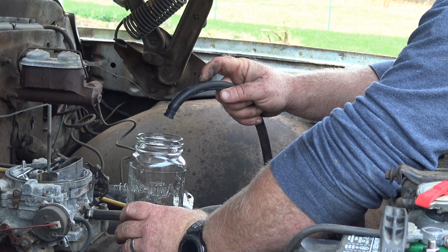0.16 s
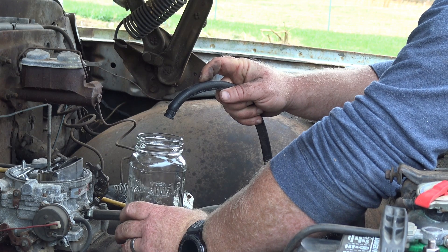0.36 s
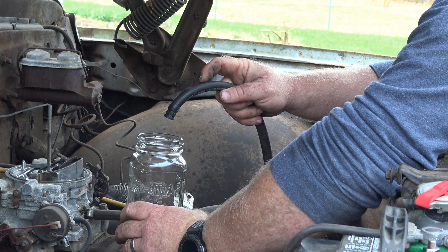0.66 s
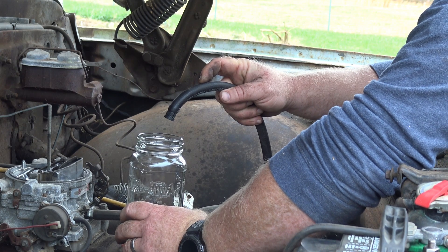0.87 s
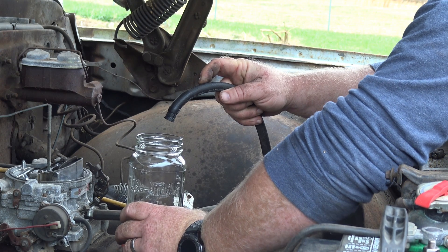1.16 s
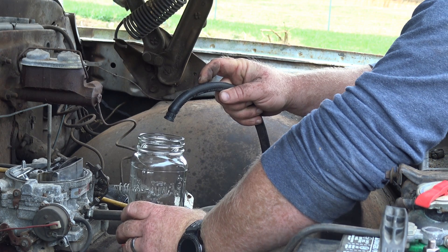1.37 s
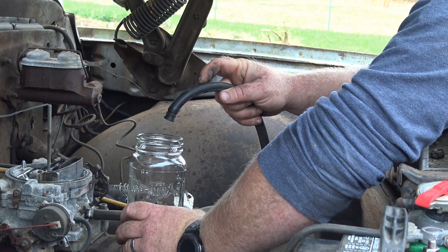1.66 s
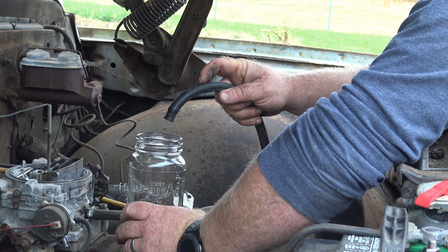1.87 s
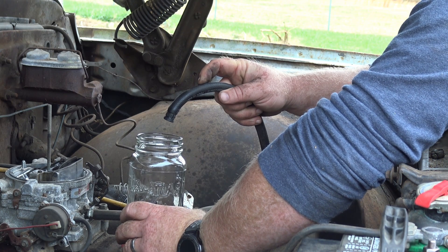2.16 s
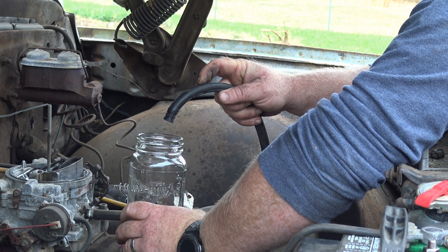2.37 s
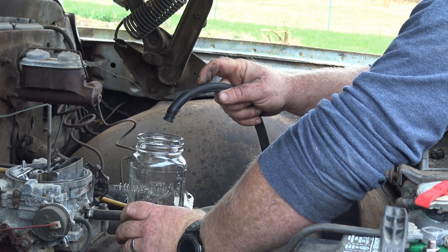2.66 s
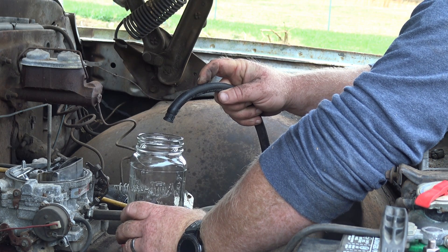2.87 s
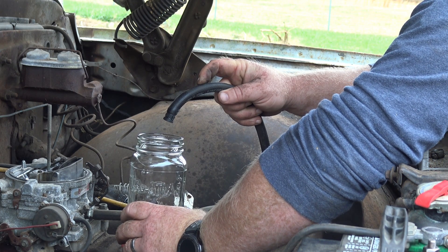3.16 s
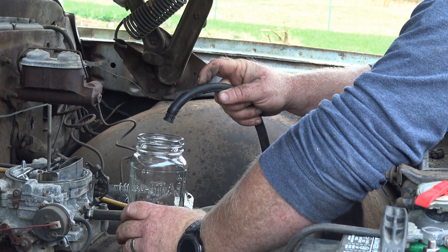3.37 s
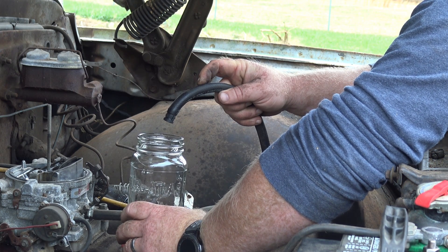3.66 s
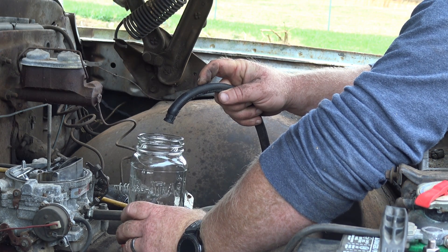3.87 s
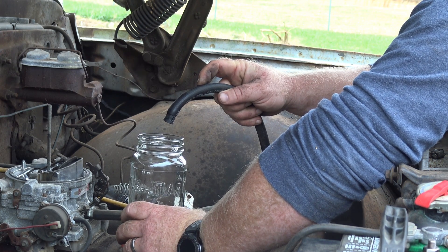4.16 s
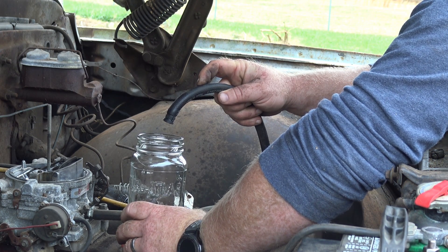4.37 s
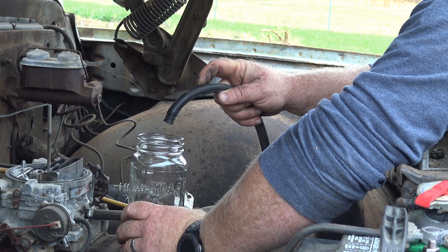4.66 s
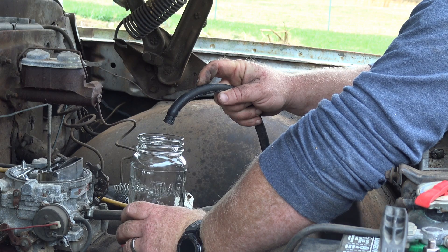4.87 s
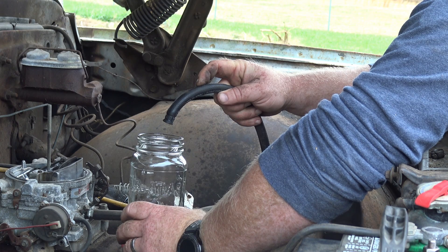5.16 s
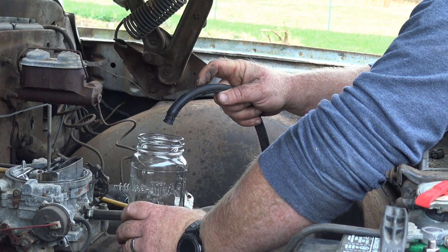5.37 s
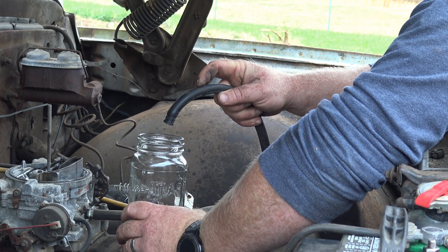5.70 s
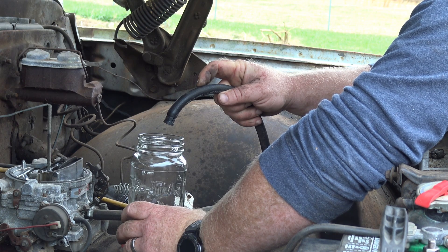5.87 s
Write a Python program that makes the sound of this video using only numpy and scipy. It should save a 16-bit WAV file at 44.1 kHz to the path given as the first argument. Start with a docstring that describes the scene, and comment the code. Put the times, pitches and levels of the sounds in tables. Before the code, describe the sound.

An old truck's starter clacks in and cranks the engine with a fast, whining, rhythmic churn, but it never fires.

```python
"""Soft rustles over quiet outdoor air, then a clack and a clunk: an old truck's starter cranks; it never fires.
The pinion clacks into the ring gear (filtered noise bursts) and drags the engine up to speed.
The gear whine is made tooth by tooth. Each compression slows the crank and presses the teeth together,
so at speed the whine sags and swells eleven times a second, ringing the housing and the engine bay.
Rasping squeals, dull knocks and the noise of the churning, rocking engine join it, under the open bonnet."""
import sys
import numpy as np
from scipy import signal
from scipy.fft import rfft, irfft, next_fast_len
from scipy.io import wavfile

SR = 44100
rng = np.random.default_rng(int(sys.argv[2]) if len(sys.argv) > 2 else 0)


def dump(signal):
    """Clip the signal to [-1, 1] and save it as 16-bit WAV at the path in sys.argv[1]."""
    limited = np.clip(np.atleast_2d(signal).T, -1, 1)
    pcm = np.round(limited * 32767).astype(np.int16)
    wavfile.write(sys.argv[1], SR, pcm)


N = 266187
TIME = np.arange(N) / SR   # seconds
FFT_SIZE = next_fast_len(N + SR)
HZ = np.maximum(np.arange(FFT_SIZE // 2 + 1) * SR / FFT_SIZE, 1)
PINION_TEETH = 9

# The slow compressions of the first turn. Each row: start in seconds, tooth rate at the start in Hz,
# fastest tooth rate in Hz, share of the stroke at which it is fastest (0-1), gear level there in dB.
FIRST_COMPRESSIONS = [(.48, 195.4, 279, .72, -14.5), (.8, 204.8, 323.5, .48, -15),
                      (.985, 317.2, 385, .25, -15), (1.103, 349.5, 415.8, .3, -15)]
# Crank speed once the first turn is over. Each row: time in seconds, speed in turns a minute.
CRANK_SPEED = [(1.2205, 162.1), (2, 168.93), (3.2, 167.96), (4.6, 171.55), (6.04, 170.06)]
# The drive takes up its slack with a knock. Each row: start in seconds, level in dB.
SLACK_KNOCKS = [(1.24, -20.5), (1.695, -27), (1.969, -20.5), (2.768, -28), (3.03, -22.5), (3.393, -23),
                (4.104, -26), (5.505, -30.5)]


def from_db(db):
    """Turn decibels into a gain."""
    return 10 ** (np.asarray(db) / 20)


def rms_one(x):
    """Scale to an rms (average strength) of 1."""
    return x / np.sqrt(np.mean(x ** 2) + 1e-20)


def follow(rows, at=TIME):
    """Join the points of a table by straight lines, one curve for each column after the first."""
    first, *columns = np.transpose(rows)
    return [np.interp(at, first, c) for c in columns]


def response(points):
    """Gain at every frequency from a few points, falling 24 dB an octave past the last one."""
    hz, db = np.transpose(points)
    gain = from_db(np.interp(np.log(HZ), np.log(hz), db))
    return gain / np.maximum(HZ / hz[-1], 1) ** 4


def resonances(modes):
    """Power response of a set of resonances: each is a peak at its own pitch."""
    power = 0
    for hz, width, db in modes:
        off_pitch = (HZ / hz - hz / HZ) * hz / width
        power = power + from_db(db) ** 2 / (1 + off_pitch ** 2)
    return power


def through(x, gain):
    """Filter that responds at once, never ahead (minimum phase), and keeps the power of white noise."""
    cepstrum = irfft(np.log(rms_one(gain) + 1e-6), FFT_SIZE)
    # folding the second half onto the first gives the minimum phase
    cepstrum[1:FFT_SIZE // 2] *= 2
    cepstrum[FFT_SIZE // 2 + 1:] = 0
    spectrum = rfft(x, FFT_SIZE) * np.exp(rfft(cepstrum))
    return irfft(spectrum, FFT_SIZE)[:N]


def noise():
    """White noise: every frequency equally strong."""
    return rng.standard_normal(N)


def drift(per_s):
    """Random wandering of rms 1, with per_s new values a second joined by straight lines."""
    return rms_one(np.interp(TIME * per_s, np.arange(N), noise()))


def burst(s, db, t60):
    """Envelope of a blow that starts at once and dies away by 60 dB in t60 seconds."""
    return (TIME >= s) * from_db(db - 60 * np.maximum(TIME - s, 0) / t60)


def rustles(rise_s=.006):
    """Soft brushing before the key is turned: noise that rises fast and dies away."""
    # Each row: start in seconds, level in dB, time to fall 60 dB in seconds.
    brushes = [(0, -56, .6), (.06, -46.5, .2), (.32, -66, 0.74)]
    # Tone colour of the brushing. Each row: frequency in Hz, relative level in dB.
    colour = [(80, -18), (170, 15), (400, -1), (900, -2), (1400, -5), (2400, -4), (3200, -10), (4500, -22),
              (6000, -25), (12000, -34)]
    level = sum(burst(s, db, t60) * np.clip((TIME - s) / rise_s, 0, 1) for s, db, t60 in brushes)
    return level * through(noise(), response(colour))


def outdoor_air(level_db=-57.5):
    """Faint steady noise, strongest in the bass: the quiet yard."""
    # Tone colour of outdoor air. Each row: frequency in Hz, relative level in dB.
    colour = [(25, -15), (50, -13), (75, -4.5), (150, -10.5), (300, -16.5), (450, -15.5), (900, -22.5),
              (1500, -29), (3000, -36), (6000, -39), (15000, -42)]
    return from_db(level_db) * through(noise(), response(colour))


def engagement(clunk_s=.495, clunk_db=-18, clunk_t60=0.24, rise_s=0.0027):
    """The solenoid pulls in, the pinion slams home and the block answers with a clunk."""
    # Blows of solenoid and pinion. Each row: start in seconds, level in dB, time to fall 60 dB in seconds.
    clacks = [(0.449, -39, 0.17), (0.46, -26.5, 0.3), (.483, -15.5, 0.071), (0.489, -11.5, 0.061)]
    # Tone colours of the clacks and of the clunk. Each row: frequency in Hz, relative level in dB.
    clack_colour = [(100, -24), (250, -8), (480, -1), (750, -4), (1100, -6), (1800, -3), (2600, -5),
                    (4000, -11.5), (6300, -12.5), (8000, -23.5), (11000, -23), (14500, -34), (15500, -40)]
    clunk_colour = [(100, -14), (150, -20), (300, 3), (520, 3), (720, -10), (880, 7), (1270, -14),
                    (1700, -4), (2400, -6)]
    blows = sum(burst(s, db, t60) * np.clip((TIME - s) / rise_s, 0, 1) for s, db, t60 in clacks)
    clack = through(noise() * blows, response(clack_colour))
    clunk = through(noise() * burst(clunk_s, clunk_db, clunk_t60), response(clunk_colour))
    return clack + clunk


def turning(rise_s=0.033):
    """Gain that fades in as the starter begins to turn."""
    return np.clip((TIME - FIRST_COMPRESSIONS[0][0]) / rise_s, 0, 1)


def spin_up(end_hz=385, dip_db=-9, first_db=-9.5, roundness=1.9):
    """Tooth rate and gear level in the first turn: both swell after each compression and sink into the next."""
    starts, slow_hz, fast_hz, fastest_at, peak_db = np.transpose(FIRST_COMPRESSIONS)
    edges = np.r_[starts, CRANK_SPEED[0][0]]
    peaks = starts + fastest_at * np.diff(edges)
    times = np.sort(np.r_[edges, peaks])
    rates_hz = np.r_[np.c_[slow_hz, fast_hz].ravel(), end_hz]   # slow and fast by turns
    tooth_hz = np.interp(TIME, times, rates_hz)
    from_peak = np.interp(TIME, times, np.arange(len(times)) % 2 == 0)   # 0 at a peak, 1 at an edge
    level_db = np.interp(TIME, peaks, peak_db) + dip_db * from_peak ** roundness
    # softer still at first contact
    return tooth_hz, level_db + np.interp(TIME, [starts[0], peaks[0]], [first_db, 0])


def load(share, peak_at):
    """Load on the teeth through one stroke, 0-1: it bites at once, swells to its peak and lets go."""
    bite_from, bite_to, release_end = 0.047, 0.093, 0.92   # shares of a stroke
    bite_share, release_curve = 0.79, 2.15
    bite = np.interp(share, [bite_from, bite_to], [0, bite_share])
    swell = (1 - bite_share) * np.minimum(share / peak_at, 1)
    release = np.clip((share - peak_at) / (release_end - peak_at), 0, 1) ** release_curve
    return bite + swell - release


def surging(share, uneven=.13):
    """The crank springs forward as each compression passes, then is slowed by the next; in Hz of tooth rate."""
    size_hz, early, rise, hold, end = 50.91, .03, .08, .19, .72   # times are shares of a stroke
    surge = np.interp(share, [-early, rise, hold, end], [0, 1, 1, 0], period=1) - .5
    return size_hz * surge * (1 + uneven * drift(11))   # no two compressions are quite alike


def crank(waver=.009):
    """Tooth rate, gear level and rattle: the spin-up, then four compressions to every turn."""
    # The four compressions of a turn. Each row: lead as a share of a stroke, peak load in dB,
    # share of the stroke at which it peaks, tooth rate offset in Hz.
    compressions = [(0, 4, 0.28, -1), (.02, 4, 0.45, 10), (.05, 0.94, 0.44, 8), (.072, 1.1, .5, -6)]
    # Gear level at cranking speed, before the load. Each row: time in seconds, level in dB.
    gear_level = [(1.2, -16.5), (4.3, -19.5), (6.04, -19)]
    ring_teeth = 168
    rattle_first_db, rattle_true_db, rattle_settle = 3.5, -3.5, 0.78   # settles over a share of each stroke
    slack_s, slack_lead_s, slack_db = .02, 0.0085, -8   # the gear goes slack just ahead of each knock

    lead, peak_db, peak_at, offset_hz = np.transpose(compressions)
    per_turn = len(compressions)
    running = TIME > CRANK_SPEED[0][0]
    rpm, = follow(CRANK_SPEED)
    even_strokes = per_turn * np.cumsum(running * rpm / 60) / SR
    strokes = even_strokes + np.interp(even_strokes, np.arange(per_turn) - lead, lead, period=per_turn)
    cylinder = strokes.astype(int) % per_turn
    share = strokes % 1

    middles = np.arange(per_turn) + .5
    cylinder_hz = np.interp(strokes, middles, offset_hz, period=per_turn)
    steady_hz = ring_teeth * rpm / 60 + surging(share) + cylinder_hz

    unloaded_db = -11
    load_db = unloaded_db + (peak_db[cylinder] - unloaded_db) * load(share, peak_at[cylinder])
    steady_db = follow(gear_level)[0] + load_db

    early_hz, early_db = spin_up()
    slack = 0
    for s, _ in SLACK_KNOCKS:
        slack = slack + ((TIME > s - slack_lead_s - slack_s) & (TIME < s - slack_lead_s))
    tooth_hz = np.where(running, steady_hz, early_hz) * (1 + waver * drift(40))
    level_db = np.where(running, steady_db, early_db) + slack_db * slack
    rattle_db = np.interp(share * running, [0, rattle_settle], [rattle_first_db, rattle_true_db])
    return tooth_hz, level_db, rattle_db


def pinion_runout(teeth):
    """The pinion runs slightly out of true: a sine wave, -1 to 1, once a turn of the pinion."""
    return np.sin(2 * np.pi * teeth / PINION_TEETH)


def gear(teeth, level_db, rattle_db, jitter_s=.000022, scatter_db=2.0, slide=2.5, runout_db=1.06):
    """Each tooth lands with a click, a little early or late, then scrapes along its mate."""
    landed = np.flatnonzero(np.diff(np.floor(teeth)))
    chance = rng.standard_normal((len(landed), 2))
    when = np.interp(np.floor(teeth[landed + 1]), teeth, TIME) + jitter_s * chance[:, 0]
    clicks = np.zeros(N)
    clicks[np.clip(np.round(when * SR).astype(int), 0, N - 1)] = from_db(scatter_db * chance[:, 1])
    scrape = rms_one(noise() * np.exp(-slide * (teeth % 1)))
    rattle = from_db(rattle_db)   # scrape against click
    mesh = (rms_one(clicks) + rattle * scrape) / np.sqrt(1 + rattle ** 2)
    bite_db = level_db + runout_db * pinion_runout(teeth)   # bites deeper once a turn
    return from_db(bite_db) * mesh


def soften(force, tooth_hz, soft_hz=9000, slow_hz=225, fast_hz=340):
    """Slow teeth meet gently, so their clicks lack the top treble."""
    soft = signal.sosfilt(signal.butter(2, soft_hz, fs=SR, output="sos"), force)
    hard = np.clip((tooth_hz - slow_hz) / (fast_hz - slow_hz), 0, 1)
    return hard * np.roll(force, 1) + (1 - hard) * soft   # the hard clicks sit one sample later


def housing(force, ring_db=12):
    """The castings and the tin cover ring under the teeth: a broad response plus many narrow peaks."""
    # Broad response of the castings. Each row: frequency in Hz, relative level in dB.
    broad = [(200, -21), (450, -20), (800, -7), (1200, -16), (1700, 2.5), (2100, -14), (2600, 5.5),
             (4000, -1), (5000, 0), (6700, -1.5), (8000, -14), (11000, -17), (13500, -26), (16000, -58)]
    # Resonances of starter housing and flywheel cover. Each row: pitch in Hz, width in Hz, relative level in dB.
    ringing = [(911, 94, -10), (1103, 9.7, -3.5), (1228, 22, -7), (1390, 25, -6), (1522, 23, -3.5),
               (1866.5, 40, 2), (1979, 41, 3), (2164, 13, 2), (2345, 49.6, 7.5), (2453, 29, 0),
               (2687, 50, -3.5), (2812, 15, -0.5), (2916, 17, -3), (3114, 45, 2), (3263, 35, -1),
               (3400, 45.1, -3), (3595, 48, -2), (3746, 63, -1), (3800, 33, -10), (4058, 64, -2.5),
               (4327, 75, -7), (4455, 69, -5), (4623, 40, -13), (4886, 49, -8.5), (5376, 50, -5.5),
               (5590, 38, -3.5), (5760, 80, -11), (6350, 57, -7), (6730, 37, -17.5)]
    power = response(broad) ** 2 + from_db(ring_db) ** 2 * resonances(ringing)
    return through(force, np.sqrt(power))


def engine_bay(x, t60=0.067, wet_db=-10, first_s=.002, spread=0.54):
    """Close metal faces smear each click; bonnet, wings and bulkhead add dense short reflections."""
    for path_s in (.0004, .0007, .0011, .0016):
        # an all-pass loop smears in time and leaves the tone colour alone
        loop = np.r_[1, np.zeros(round(path_s * SR)), -spread]
        x = signal.lfilter(loop[::-1], loop, x)
    t = TIME[:SR // 4]
    echoes = rng.standard_normal(len(t)) * from_db(-60 * t / t60) * (t > first_s)
    wet = signal.fftconvolve(x, echoes / np.linalg.norm(echoes))[:N]
    return (x + from_db(wet_db) * wet) / np.sqrt(1 + from_db(wet_db) ** 2)


def whine(teeth, level_db, waver_db=2.5, wobble=0.51, rub_db=-29, load_share=0.39, runout_db=3.0):
    """The mesh shakes the block, and a panel rings on each time the tooth rate sweeps across its note."""
    # Shake at multiples of the tooth rate. Each row: multiple, relative level in dB while the motor
    # strains, relative level in dB at speed.
    multiples = [(1, -31, -41.5), (2, -36.5, -46), (3, -38, -45)]
    # Level of the block's shake. Each row: time in seconds, relative level in dB.
    shake_level = [(.53, -0.5), (.88, 1.5), (1.1, -0.5), (1.3, 1), (3.3, -1.5), (6.04, 0.5)]
    # A sheet-metal panel hums near the tooth rate. Each row: pitch in Hz, width in Hz, relative level in dB.
    panel = [(473.2, 20.36, 14)]
    strain_eases_s, strain_release_s = 1.168, 0.2   # the motor strains until the engine is up to speed
    strain = np.clip(1 - (TIME - strain_eases_s) / strain_release_s, 0, 1)

    # the shake follows the load and the pinion's turn
    drive_db = follow(shake_level)[0] + load_share * (level_db - np.median(level_db))
    drive_db = drive_db + runout_db * pinion_runout(teeth)
    shake = 0
    for multiple, slow_db, fast_db in multiples:
        db = drive_db + strain * slow_db + (1 - strain) * fast_db + waver_db * drift(60)
        blur = multiple * wobble * drift(140)   # uneven teeth blur the higher multiples most
        shake = shake + from_db(db) * np.sin(2 * np.pi * multiple * teeth + blur)

    rub = from_db(drive_db + rub_db) * noise()
    push = (1 - 0.58 * strain) * (shake + rub)   # the panel is driven less during the strain
    hum = 0
    for hz, width, db in panel:
        hum = hum + from_db(db) * signal.lfilter(*signal.iirpeak(hz, hz / width, SR), push)
    return shake + hum


def churning():
    """Pistons, valve gear and pumped air: broad noise with a slowly changing level."""
    # Tone colour of the churning. Each row: frequency in Hz, relative level in dB.
    colour = [(20, -55), (50, -40), (80, -9), (115, -11.5), (160, -12), (205, -2.5), (270, 1.5), (350, -1),
              (550, 5), (750, -1.5), (1100, 5.5), (1600, -3), (3000, -40.5)]
    # Level of the churning. Each row: time in seconds, level in dB.
    churn_level = [(.5, -35), (.75, -39), (1.35, -33.5), (4, -37), (6.04, -35)]
    return from_db(follow(churn_level)[0]) * through(noise(), response(colour))


def rocking():
    """The engine rocks on its mounts: a deep rumble of noise, strongest near 50 Hz."""
    # Tone colour of the rumble. Each row: frequency in Hz, relative level in dB.
    colour = [(15, -27), (32, -8), (50, 1), (66, -8), (100, -19), (200, -41)]
    # Level of the rocking. Each row: time in seconds, level in dB.
    rumble_level = [(.55, -70.5), (1.3, -59), (3.3, -59), (3.8, -65), (6.04, -69)]
    return from_db(follow(rumble_level)[0]) * through(noise(), response(colour))


def squeal(middle_hz=1100, sag_hz_per_s=790, rough=0.89):
    """The gears squeal roughly as the motor gathers speed: sagging tones with a shaky phase."""
    # Each row: middle in seconds, seconds from the middle to silence on either side, peak level in dB.
    squeals = [(0.75, .1, -30), (1.035, .1, -28), (1.177, .09, -22.5)]
    out = 0
    for s, length, db in squeals:
        t = np.clip(TIME - s, -length, length)
        hz = middle_hz - sag_hz_per_s * t
        swell = np.cos(np.pi / 2 * t / length) ** 4
        phase = 2 * np.pi * np.cumsum(hz) / SR + rough * drift(220)
        out = out + from_db(db) * swell * np.sin(phase)
    return out


def knocks(t60=0.26):
    """Dull blows as the drive catches up with the flywheel: dying bursts of filtered noise."""
    # Tone colour of the knocks. Each row: frequency in Hz, relative level in dB.
    colour = [(100, -35), (180, -11), (280, 0.5), (420, 1.5), (700, -6), (1500, -5.5), (4000, -15)]
    blows = sum(burst(s, db, t60) for s, db in SLACK_KNOCKS)
    return through(noise() * blows, response(colour))


def scene():
    """Starter gear, churning engine and the quiet yard, added together."""
    tooth_hz, level_db, rattle_db = crank()
    teeth = np.cumsum(tooth_hz) / SR   # teeth passed so far
    force = soften(turning() * gear(teeth, level_db, rattle_db), tooth_hz)
    starter = engine_bay(housing(force)) + turning() * whine(teeth, level_db) + squeal()
    engine = turning() * (churning() + rocking())
    mix = starter + engagement() + knocks() + engine + rustles() + outdoor_air()
    return mix[None]


def record(dry, top=1.1, dull_hz=13800, cutoff_hz=15750):
    """The deepest bass and the highest treble are rolled off, peaks are rounded and the top is cut steeply."""
    dry = signal.sosfilt(signal.butter(2, 25, "high", fs=SR, output="sos"), dry)
    dry = dry / (1 + (dry / top) ** 4) ** (1 / 4)   # peaks bend over and never pass top
    dry = signal.sosfilt(signal.butter(4, dull_hz, fs=SR, output="sos"), dry)
    return signal.sosfilt(signal.ellip(12, .1, 90, cutoff_hz, fs=SR, output="sos"), dry)


dry = scene()
out = record(dry)
dump(out)
```